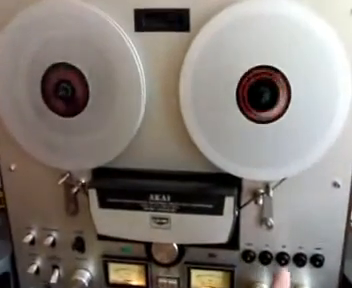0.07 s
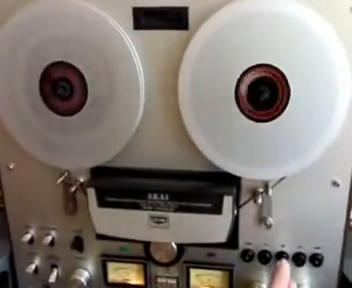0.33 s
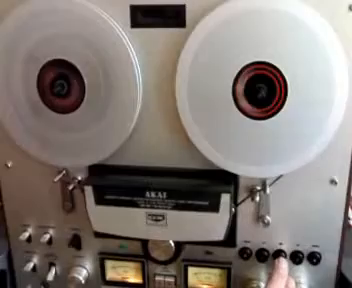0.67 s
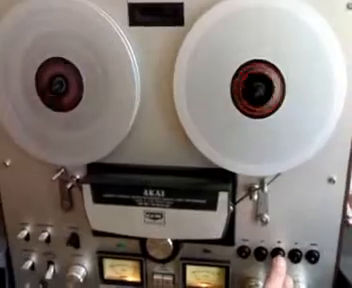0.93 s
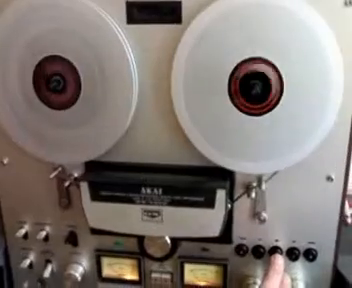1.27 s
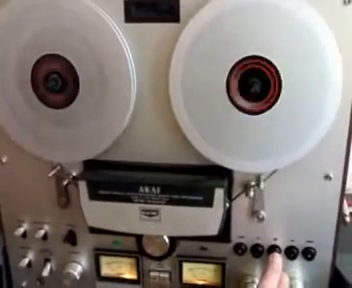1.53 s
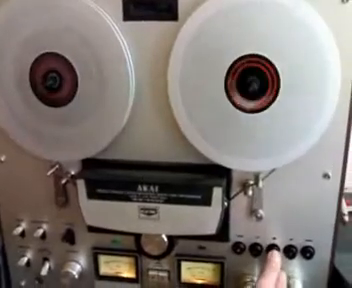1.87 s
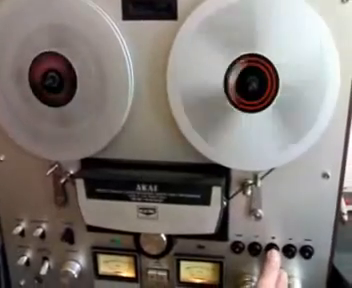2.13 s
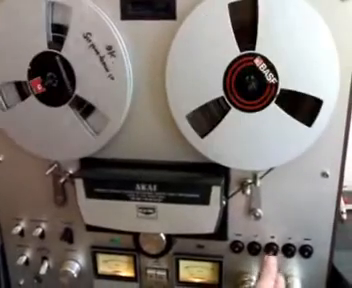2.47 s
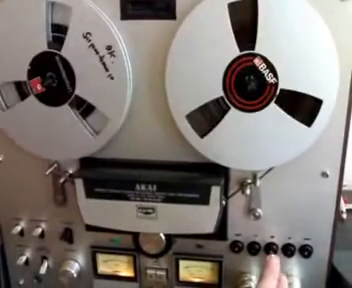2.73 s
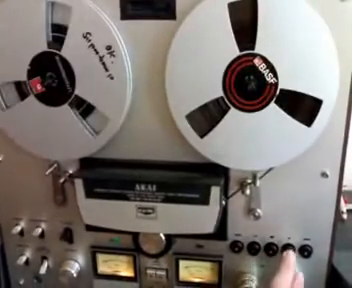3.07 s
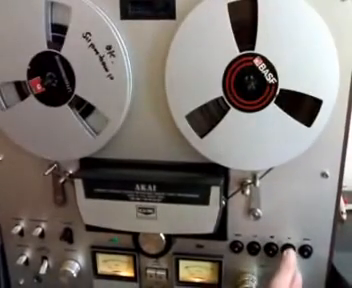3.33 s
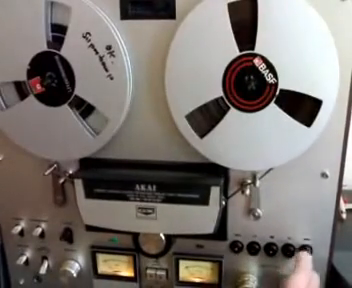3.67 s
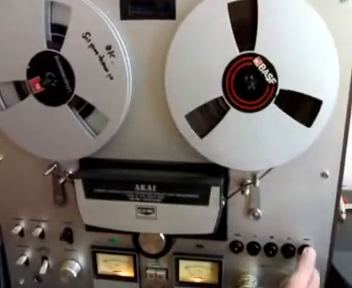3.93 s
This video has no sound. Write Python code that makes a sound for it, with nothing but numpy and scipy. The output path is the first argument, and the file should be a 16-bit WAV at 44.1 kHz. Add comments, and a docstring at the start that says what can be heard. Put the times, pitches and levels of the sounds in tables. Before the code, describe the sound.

A reel-to-reel tape machine fast-winds with a soft, throbbing whir, the tape swishing and scuffing against a reel. It stops with a loud, ringing clunk, then idles faintly, close to the microphone in a small room.

```python
"""Tape machine winds and stops

An open-reel tape machine fast-winds in a small room, close to the microphone. The reel motors hum,
throbbing once a turn, while the tape swishes and scuffs against a reel flange. The stop button drops
the brakes with a loud clunk that rings the chassis and the room; the capstan motor idles on and a
finger shifts on the buttons."""
import sys
import numpy as np
from scipy import signal
from scipy.fft import rfft, irfft
from scipy.io import wavfile

SR = 44100
rng = np.random.default_rng(int(sys.argv[2]) if len(sys.argv) > 2 else 0)


def materialize(psi):
    """Save the field psi as 16-bit PCM at rate SR to the path in sys.argv[1].

    A 1-D psi becomes a single channel; in a 2-D psi each row is a channel.
    """
    bounded = np.clip(np.atleast_2d(psi).T, -1, 1)
    quanta = np.round(bounded * 32767).astype(np.int16)
    wavfile.write(sys.argv[1], SR, quanta)


N = 176400
TIME = np.arange(N) / SR
TURNS_PER_S, TREBLE_EDGE_HZ = 12.84, 7680
LN_1000 = np.log(1000)  # time constants in a 60 dB decay

# colour of the mechanism's clatter: (frequency [Hz], relative level [dB])
CLATTER_COLOUR = [(140, -18), (200, -0.5), (290, 2.5), (480, -3), (640, -11), (780, 0), (1130, -4),
                  (1300, -5), (1650, -4), (2080, -5), (2200, -16), (2950, -3.5), (3300, -8.5), (3600, -7),
                  (4250, -10.5), (4650, -8), (5600, -16), (7600, -29.5)]


def amp(db):
    """Decibels to gain."""
    return 10 ** (np.asarray(db) / 20)


def unit(x):
    """Scales to rms 1."""
    return x / np.sqrt(np.mean(x ** 2) + 1e-20)


def curve(points, hz):
    """Interpolates a table on a log-frequency axis."""
    f, value = np.transpose(points)
    return np.interp(np.log(hz + 1), np.log(f + 1), value)


def fader(points):
    """Gain over time from (time [s], level [dB]) points."""
    return amp(np.interp(TIME, *np.transpose(points)))


def noise(*colours):
    """Noise of rms 1 shaped by the given colours and cut at the treble edge."""
    hz = np.fft.rfftfreq(N, 1 / SR)
    gain = amp(sum(curve(colour, hz) for colour in colours)) * (hz < TREBLE_EDGE_HZ)
    return unit(irfft(rfft(rng.standard_normal(N)) * gain, N))


def band(hz, octaves):
    """Noise of rms 1 in a bell around hz."""
    away = np.log2((np.fft.rfftfreq(N, 1 / SR) + 1) / hz) / octaves
    return unit(irfft(rfft(rng.standard_normal(N)) * np.exp(-.5 * away ** 2), N))


def drift(rate_hz):
    """Random wandering of rms 1."""
    lowpass = np.exp(-(np.fft.rfftfreq(N, 1 / SR) / rate_hz) ** 2)
    return unit(irfft(rfft(rng.standard_normal(N)) * lowpass, N))


def tone(hz):
    """A sine of random phase following a pitch."""
    return np.sin(2 * np.pi * (np.cumsum(hz * np.ones(N)) / SR + rng.random()))


def wavering(partials):
    """Motor tones that wander in level and pitch."""
    waver_db, waver_hz = 3, 2
    return sum(amp(db + waver_db * drift(5.5)) * tone(hz + waver_hz * drift(4.83)) for hz, db in partials)


def arch(start, length):
    """A smooth swell and fall."""
    return np.sin(np.pi * np.clip((TIME - start) / length, 0, 1))


def struck(start, rise, decay):
    """A quick attack and an exponential decay."""
    age = np.maximum(TIME - start, 0)
    return (1 - np.exp(-age / rise)) * np.exp(-np.minimum(age / decay, 60))


def contact(peak_s=0.018):
    """How hard the tape presses on its guides, 0-1, peaking once a turn."""
    return np.abs(np.cos(np.pi * TURNS_PER_S * (TIME - peak_s)))


def reel_motors():
    """Mains harmonics throb and sway in pitch with every turn of the reel."""
    # motor hum: (frequency [Hz], level [dB], throb depth [ratio], pitch sway [ratio], throb peak [s])
    hum = [(207.6, -70.5, 0.4, 0.49, 0.067), (303, -62.5, 0.62, -0.42, 0.018),
           (394.6, -70.5, 0.49, -0.0081, 0.02), (499.5, -55, 0.76, -0.77, 0.014)]
    glide_rad = 0.38  # slides the pitch down through each throb
    out = np.zeros(N)
    for hz, db, depth, sway, peak in hum:
        turn = 2 * np.pi * TURNS_PER_S * (TIME - peak)
        mains = np.exp(2j * np.pi * (hz * TIME + rng.random()) + 1j * glide_rad * np.cos(turn))
        throb = 1 + depth * np.cos(turn) + 1j * sway * np.sin(turn)
        out += np.sqrt(2) * amp(db) * (mains * throb).real
    return out


def tape_swish():
    """Once a turn the tape presses on its guides: a swish with a chirp that arches up and back."""
    # colour of the swish: (frequency [Hz], relative level [dB])
    colour = [(500, -13), (950, -2.5), (1200, -7.5), (1900, -10), (3700, -15), (5000, -8.5), (7500, -31)]
    chirp_hz, rise_hz, width_hz = 4570, 810, 260
    touch = contact()
    pressure = amp(1.4 * drift(rate_hz=12)) * touch ** 3.9
    chirp = drift(width_hz) * tone(chirp_hz + rise_hz * (1 + 0.2 * drift(TURNS_PER_S)) * touch ** 2)
    return pressure * (amp(-55) * noise(colour) + amp(-60) * chirp)


def tape_squeals():
    """The tape rubs and gives two faint, unsteady squeals."""
    # squeals: (start [s], length [s], gain [dB])
    squeals = [(.085, 0.12, 0), (.195, 0.098, 1.6)]
    # their partials: (harmonic [number], level [dB])
    partials = [(2, -58), (3, -50.5)]
    pitch_hz = 313 * (1 + 0.0081 * drift(rate_hz=21))
    voice = sum(amp(db) * tone(harmonic * pitch_hz) for harmonic, db in partials)
    rub = amp(-58) * band(hz=1590, octaves=0.33)
    return sum(amp(db) * arch(start, length) for start, length, db in squeals) * (voice + rub)


def tape_rush():
    """The running tape makes a steady rush."""
    # colour of the rush: (frequency [Hz], relative level [dB])
    colour = [(100, -14.5), (150, -26), (178, 4), (240, -1.5), (272, -11.5), (310, -12.5), (420, -2),
              (560, -7), (950, -7), (1200, -11), (1800, -9.5), (3700, -18), (4600, -13.5), (5400, -16.5),
              (7500, -30)]
    return amp(-53) * noise(colour)


def tape_guides():
    """The tape whistles faintly on its guides and twice squeaks in time with the turns."""
    # steady whistles: (frequency [Hz], level [dB], width [octaves])
    whistles = [(2225, -67.5, 0.0085), (4520, -68, 0.052)]
    # squeaks on a guide: (start [s], length [s], level [dB])
    squeaks = [(0.287, 0.084, -55), (0.677, 0.24, -60.5)]
    whistling = sum(amp(db) * band(hz, width) for hz, db, width in whistles)
    squeak_gain = contact() * sum(amp(db) * arch(start, length) for start, length, db in squeaks)
    return whistling + squeak_gain * band(hz=2187, octaves=0.013)


def flange_scuffs():
    """Each scuff of the tape on a flange is a short scrape that swells the modes of the reel."""
    # scuffs: (time [s], gain [dB])
    scuffs = [(0.093, -1), (.255, -3), (.32, -2), (.48, 1), (0.632, -2), (0.702, -0.5), (0.79, -2),
              (.858, -0.5), (1.023, -2), (1.182, 1.5), (1.34, -0.5), (1.49, 1), (1.719, 0), (1.879, 2),
              (2.035, 0), (2.106, 1.5)]
    # modes of the reel: (frequency [Hz], level [dB], length [s])
    reel_modes = [(203.3, -58.5, 0.11), (307.5, -46.5, 0.049), (417.3, -53, 0.054), (978, -52.5, 0.027)]
    out = np.zeros(N)
    scrape = amp(-55.5) * band(hz=1300, octaves=0.65)
    for start, db in scuffs:
        out += amp(db) * arch(start, length=0.047) * scrape
        for hz, mode_db, length in reel_modes:
            t = np.arange(0, length, 1 / SR)
            detuned_hz = hz * (1 + 0.027 * rng.uniform(-1.33, 1))
            ring = np.sin(2 * np.pi * (detuned_hz * t + rng.random()))
            out[round(start * SR):][:len(t)] += amp(db + mode_db) * np.sin(np.pi * t / length) * ring
    return out


def stop_clunk():
    """Quick blows clatter through the mechanism; the hardest rings chassis, metal parts and room."""
    # blows of the solenoid and brakes: (time [s], gain [dB])
    blows = [(2.2377, -4), (2.245, 0.5), (2.2500, -7.5), (2.2584, -8), (2.27, -15)]
    rise_s, t60_s = 0.0012, 0.2
    clatter = sum(amp(-21.5 + db) * struck(start, rise_s, t60_s / LN_1000) * noise(CLATTER_COLOUR)
                  for start, db in blows)
    hardest_s = blows[1][0]
    return clatter + chassis_ring(hardest_s) + metal_ring(hardest_s) + room_tail(hardest_s)


def chassis_ring(start):
    """The struck chassis gives the clunk its body: each mode builds up and dies away."""
    # chassis modes: (frequency [Hz], level [dB], T60 [s], build-up [s])
    modes = [(177, -25.5, 0.28, 0.017), (223, -24.5, 0.27, 0.012), (257, -19.5, 0.16, 0.0028),
             (288.5, -22, 0.18, 0.012), (383, -18, 0.088, 0.013), (430, -22, 0.27, 0.02),
             (472, -18.5, 0.23, 0.047), (1122, -20, 0.12, 0.0023), (1683, -17.5, 0.042, 0.00091)]
    return sum(amp(db) * struck(start, rise, t60 / LN_1000) * np.sin(2 * np.pi * hz * (TIME - start))
               for hz, db, t60, rise in modes)


def metal_ring(start):
    """The jolted metal parts ring in close, beating pairs."""
    # metal modes: (frequency [Hz], level [dB], T60 [s])
    modes = [(2215, -46, 0.97), (2740, -40.5, 0.28), (2864, -31.5, 0.57), (2970, -40, 0.76),
             (3500, -44, .42), (4400, -41.5, .45), (4620, -24, 0.055)]
    split_hz, rise_s = 32, 0.003
    out = np.zeros(N)
    for hz, db, t60 in modes:
        pair = tone(hz - split_hz / 2) + tone(hz + split_hz * rng.random()) / 2
        out += amp(db) * struck(start, rise_s, t60 / LN_1000) * pair
    return out


def room_tail(start):
    """The room answers the clunk with a noisy tail, each band fading at its own rate."""
    # the room's tint on the clatter: (frequency [Hz], relative level [dB])
    tint = [(200, 0), (1000, -2.5), (1900, 3.5), (2300, 5), (2950, -0.5), (5400, -0.5), (6300, -0.5)]
    # reverb time: (frequency [Hz], T60 [s])
    reverb_time = [(200, 0.67), (1900, 0.58), (2350, 0.9), (3000, 0.6), (6000, 0.67)]
    hz, t, spectrum = signal.stft(noise(CLATTER_COLOUR, tint), SR, nperseg=256)
    fade = np.exp(-LN_1000 * np.maximum(t - start, 0) / curve(reverb_time, hz)[:, None])
    tail = signal.istft(spectrum * fade, SR)[1][:N]
    attack = np.clip((TIME - start) / 0.0053, 0, 1)
    return amp(-23.5) * attack * tail


def brake_scrape():
    """The brake bands give a thin scrape as they grip."""
    return amp(-51) * arch(start=2.31, length=0.17) * band(hz=5220, octaves=0.095)


def capstan():
    """The capstan motor idles throughout: wavering tones, a soft whirr and a briefly singing bearing."""
    # motor tones: (frequency [Hz], level [dB])
    motor = [(188.4, -59.5), (394, -65.5), (947.5, -67.5), (2128, -75.5)]
    # partials of the bearing: (frequency [Hz], level [dB])
    bearing = [(479, -66), (1075, -61.5), (1206, -67), (1809, -73), (3035, -75), (3225, -78)]
    # colour of the whirr: (frequency [Hz], relative level [dB])
    whirr_colour = [(130, -7), (190, -6.5), (300, -21.5), (420, -2.5), (600, -8), (1040, 2.5),
                    (1400, -14.5), (2200, -32.5), (2700, -17.5), (3600, -27.5), (7000, -36.5)]
    # swell of the whirr: (time [s], level [dB])
    whirr_swell = [(0, -71), (2.8, -59), (3.1, -55.5), (3.38, -57), (3.65, -54), (4, -58)]
    tones = wavering(motor) + arch(start=2.81, length=0.61) * wavering(bearing)
    return tones + fader(whirr_swell) * noise(whirr_colour)


def finger():
    """A finger ticks and rubs softly on the buttons."""
    # touches: (time [s], level [dB], centre [Hz], width [octaves], attack [s], decay [s])
    touches = [(3.455, -57, 3700, .45, .0005, 0.025), (3.457, -50.5, 700, 0.83, 0.0023, 0.03),
               (3.571, -53, 2040, 0.26, 0.0012, 0.031), (3.618, -57, 2620, 0.15, 0.0019, 0.043),
               (3.639, -46, 1430, 0.33, 0.0092, 0.041)]
    return sum(amp(db) * struck(start, rise, decay) * band(hz, width)
               for start, db, hz, width, rise, decay in touches)


def background():
    """Room tone, a low rumble with the drone of the capstan shaft in it, and a thin electrical whine."""
    # room tone and microphone hiss: (frequency [Hz], relative level [dB])
    room_tone = [(10, -8.5), (32, -20.5), (48, 2), (62, -8), (240, -7.5), (550, -20.5), (1500, -21.5),
                 (5000, -32), (7500, -37.5)]
    # colour of the rumble: (frequency [Hz], relative level [dB])
    rumble_colour = [(25, -3.5), (50, -7), (130, -10.5), (2000, -57.5)]
    # swells of the rumble and drone: (time [s], gain [dB])
    rumble_swell = [(0, -60.5), (.45, -62), (.7, -69.5), (2.0, -58.5), (2.4, -77.5), (3.3, -65),
                    (3.6, -53.5), (4, -49.5)]
    shaft_hz, whine_step_hz, whine_centre_hz, whine_width_hz = 48.4, 293, 6190, 740
    whine = sum(np.exp(-((hz - whine_centre_hz) / whine_width_hz) ** 2) * np.cos(2 * np.pi * hz * TIME)
                for hz in np.arange(whine_step_hz, TREBLE_EDGE_HZ, whine_step_hz))
    rumble = fader(rumble_swell) * (noise(rumble_colour) + amp(5.5) * tone(shaft_hz))
    return amp(-56) * noise(room_tone) + rumble + amp(-75.5) * whine


def scene():
    """The winding runs until the brakes bite, leaving the idling deck and the room."""
    stop_s, fade_s = 2.46, 0.1
    running = np.clip(1 - (TIME - stop_s) / fade_s, 0, 1)
    winding = reel_motors() + tape_swish() + tape_squeals() + tape_rush() + tape_guides() + flange_scuffs()
    return (running * winding + stop_clunk() + brake_scrape() + capstan() + finger() + background())[None]


def record(dry):
    """A steep treble cut and a constant DC offset."""
    lowpass = signal.firwin(801, TREBLE_EDGE_HZ, window=("kaiser", 9), fs=SR)
    return signal.oaconvolve(dry, lowpass[None], "same") - 0.0427


dry = scene()
out = record(dry)
materialize(out)
```